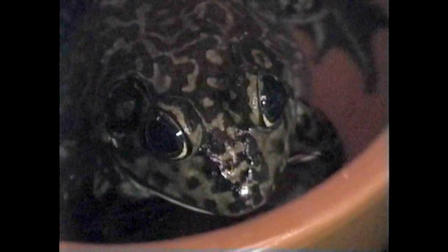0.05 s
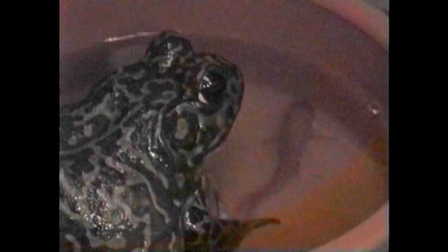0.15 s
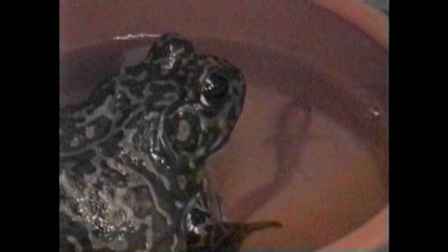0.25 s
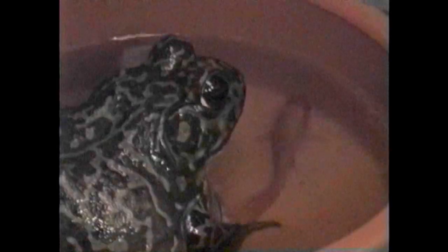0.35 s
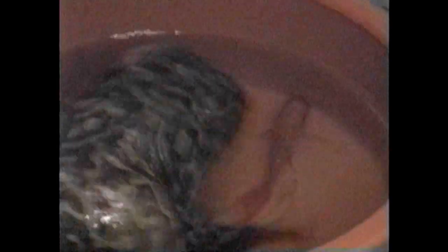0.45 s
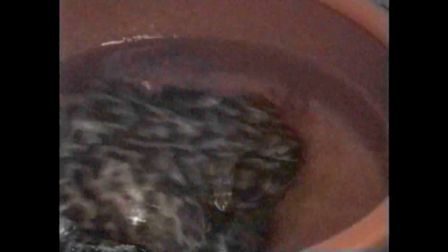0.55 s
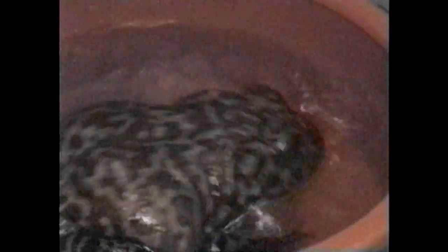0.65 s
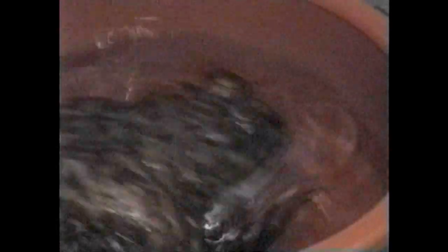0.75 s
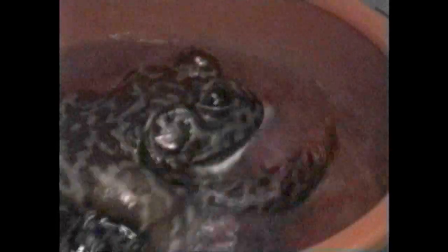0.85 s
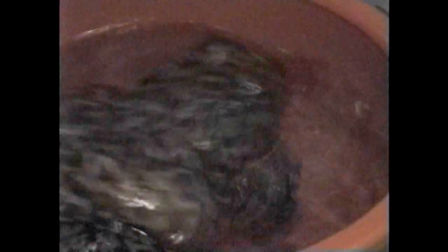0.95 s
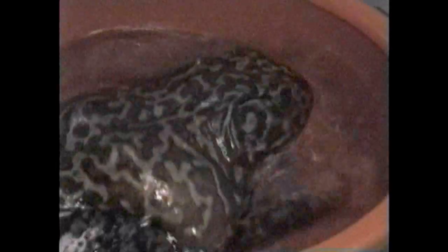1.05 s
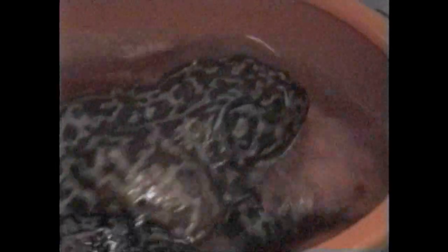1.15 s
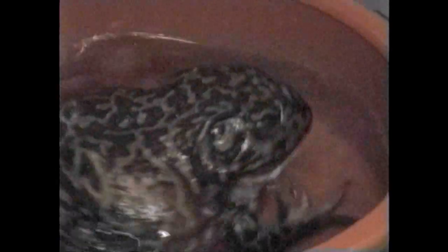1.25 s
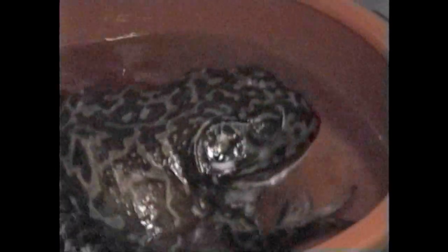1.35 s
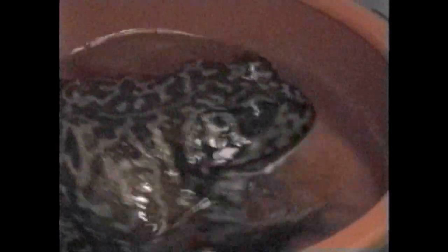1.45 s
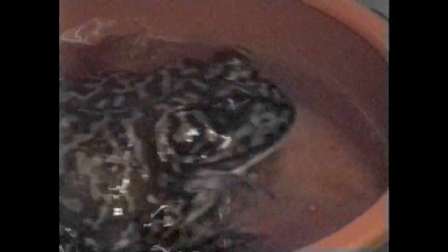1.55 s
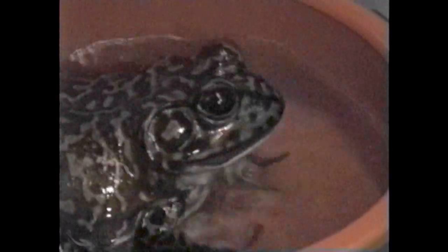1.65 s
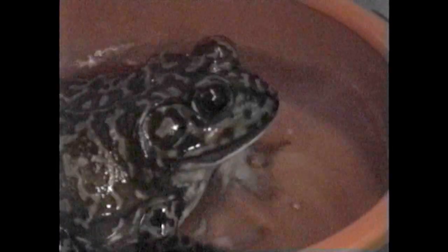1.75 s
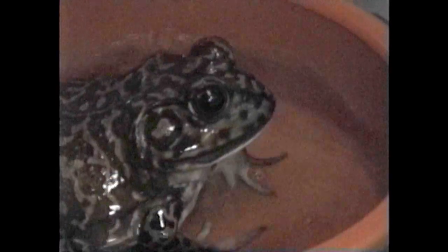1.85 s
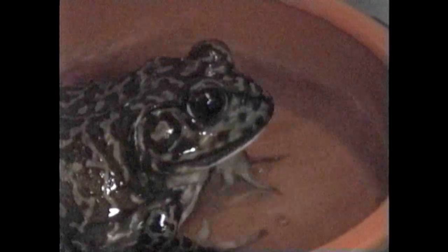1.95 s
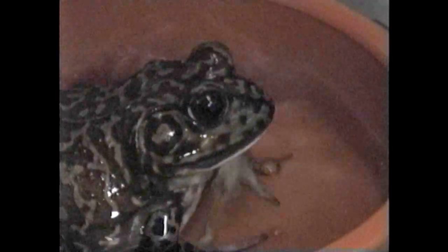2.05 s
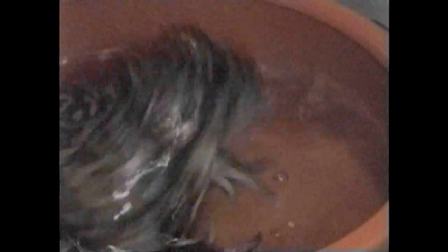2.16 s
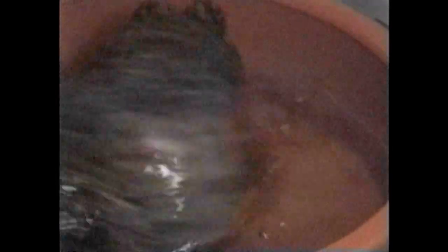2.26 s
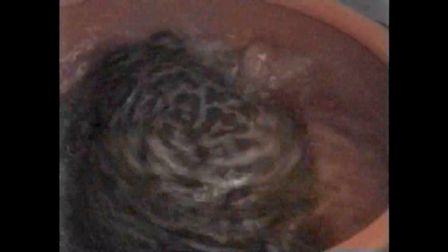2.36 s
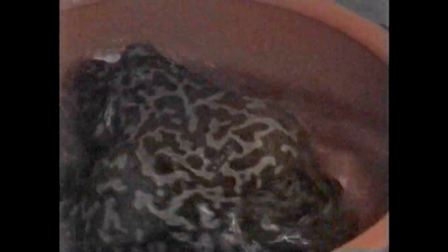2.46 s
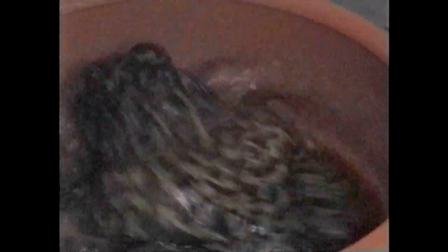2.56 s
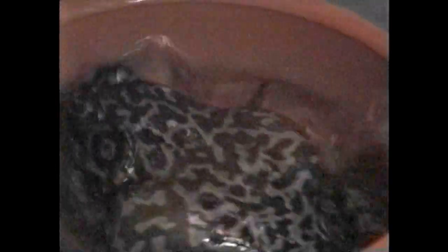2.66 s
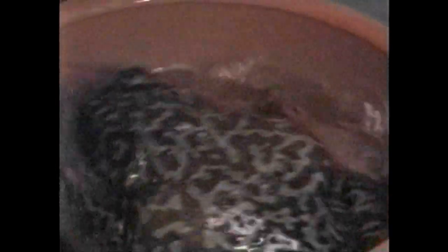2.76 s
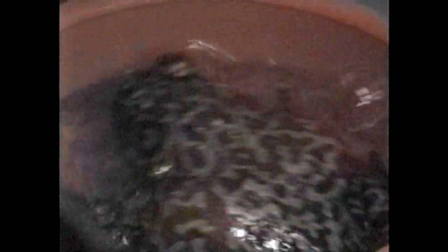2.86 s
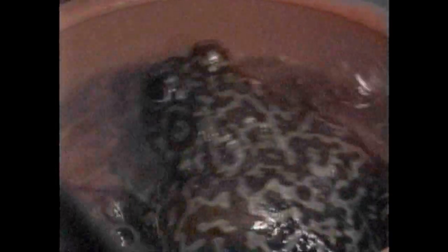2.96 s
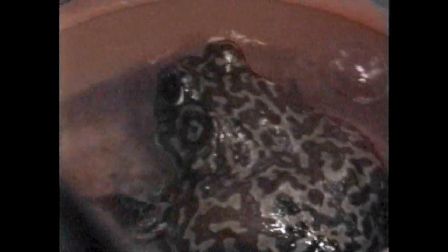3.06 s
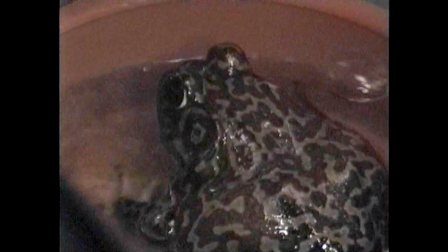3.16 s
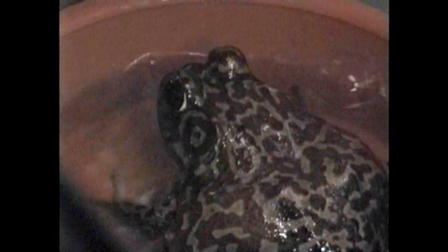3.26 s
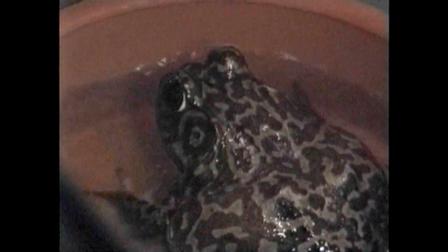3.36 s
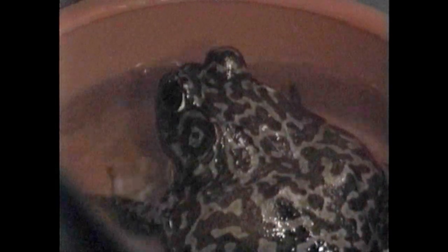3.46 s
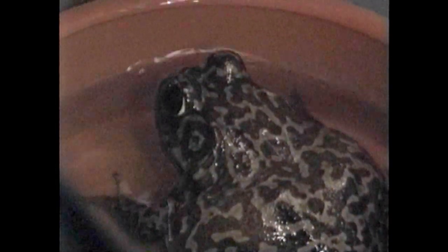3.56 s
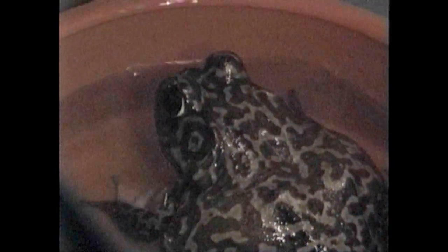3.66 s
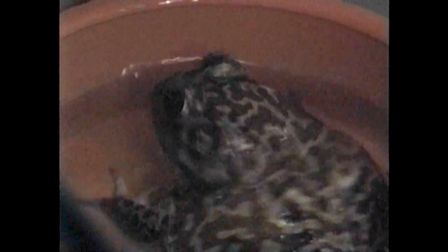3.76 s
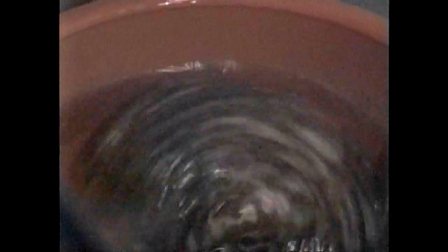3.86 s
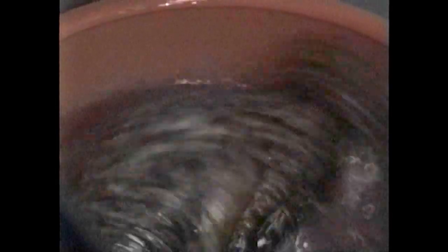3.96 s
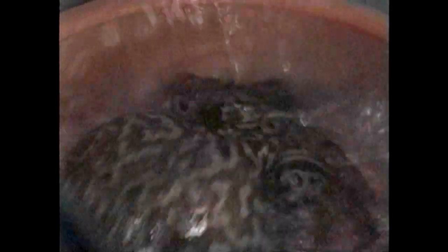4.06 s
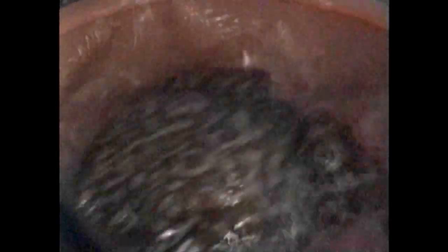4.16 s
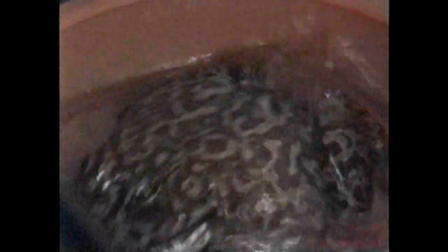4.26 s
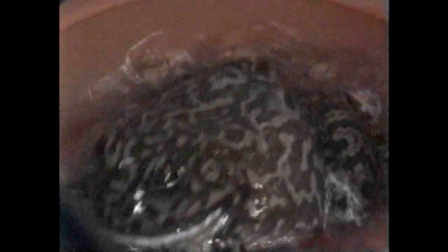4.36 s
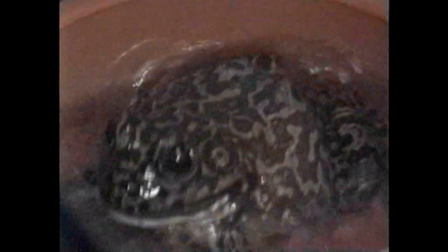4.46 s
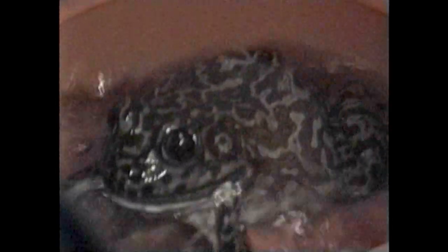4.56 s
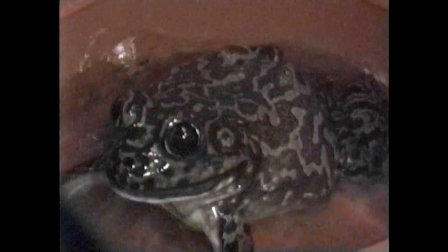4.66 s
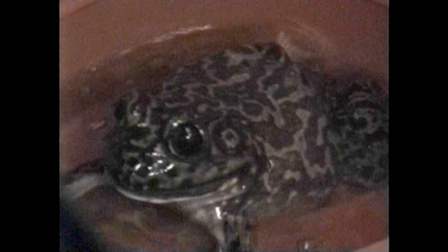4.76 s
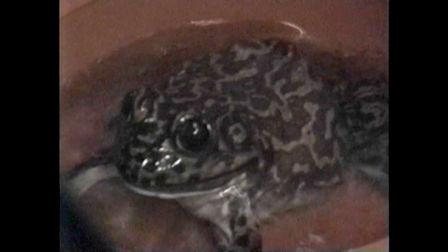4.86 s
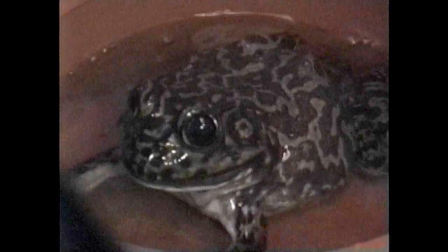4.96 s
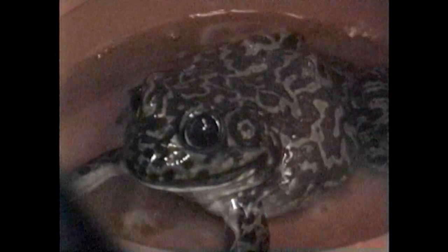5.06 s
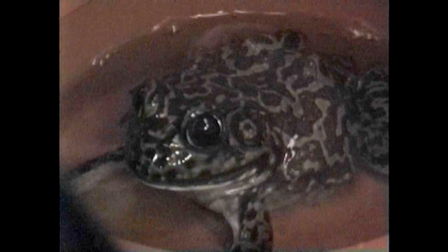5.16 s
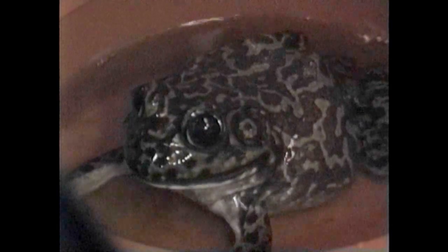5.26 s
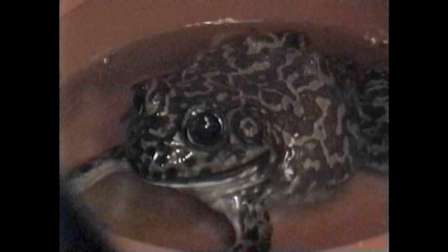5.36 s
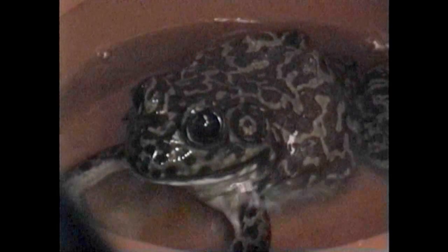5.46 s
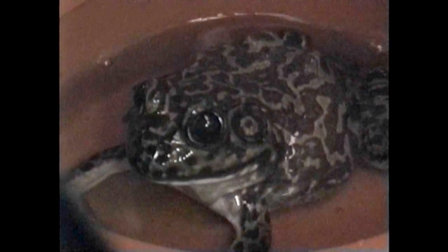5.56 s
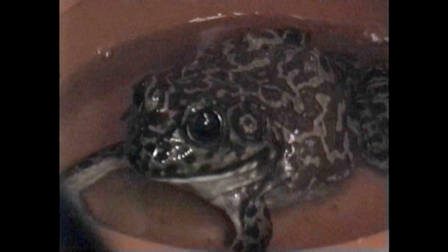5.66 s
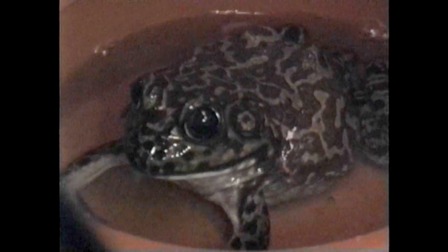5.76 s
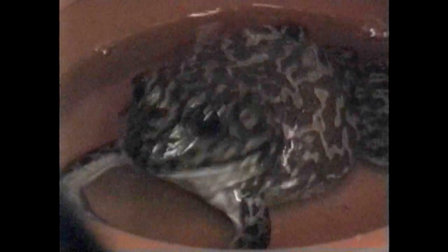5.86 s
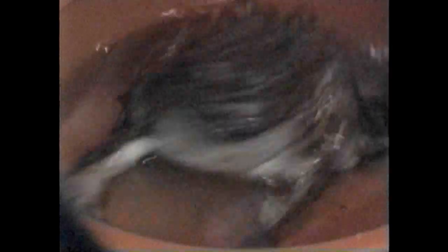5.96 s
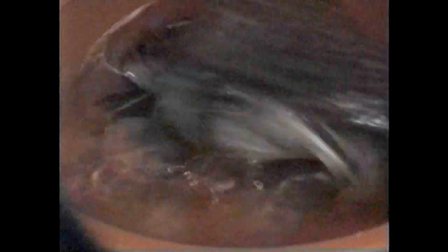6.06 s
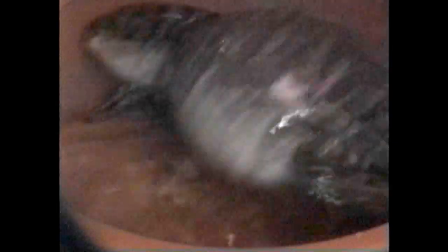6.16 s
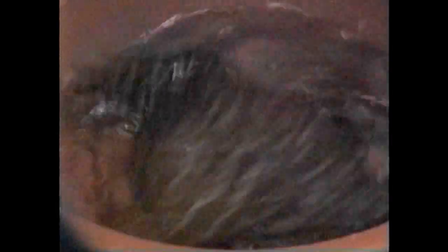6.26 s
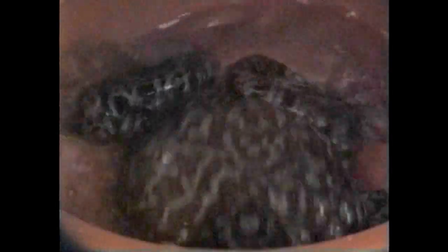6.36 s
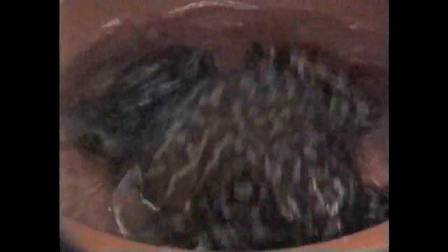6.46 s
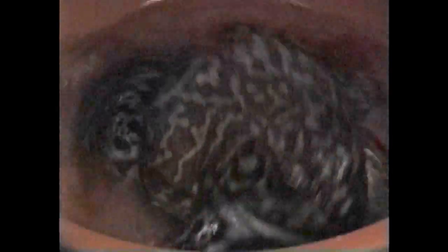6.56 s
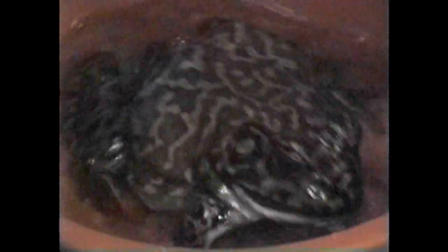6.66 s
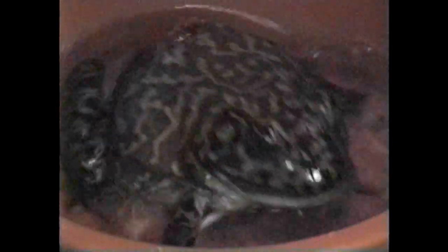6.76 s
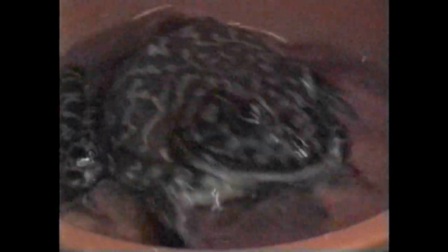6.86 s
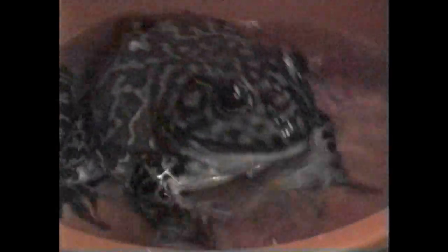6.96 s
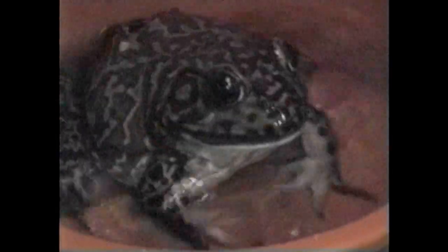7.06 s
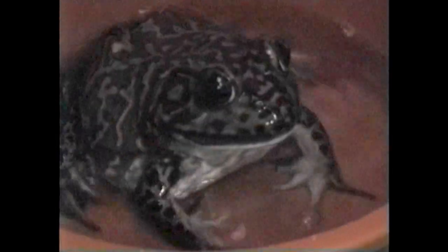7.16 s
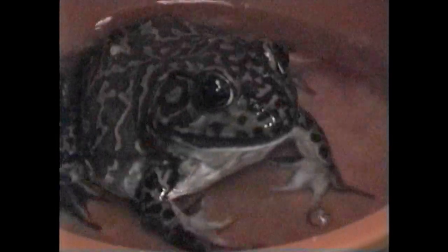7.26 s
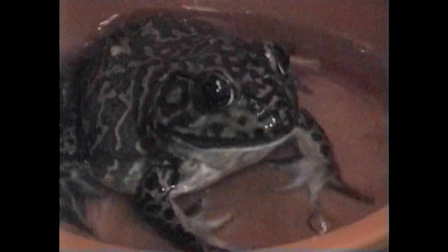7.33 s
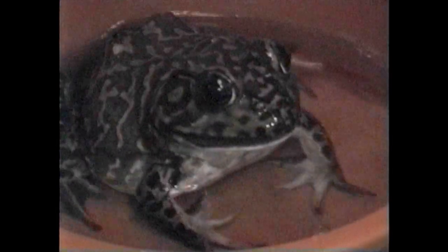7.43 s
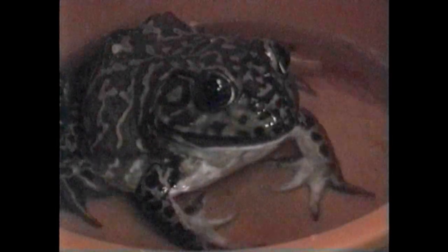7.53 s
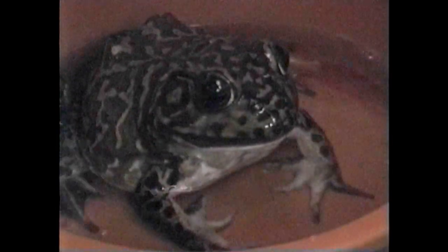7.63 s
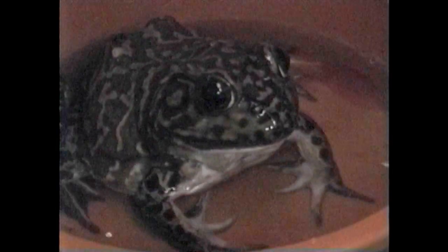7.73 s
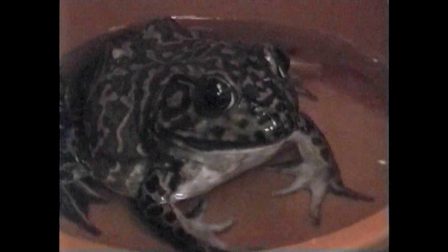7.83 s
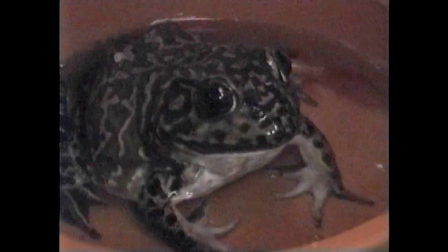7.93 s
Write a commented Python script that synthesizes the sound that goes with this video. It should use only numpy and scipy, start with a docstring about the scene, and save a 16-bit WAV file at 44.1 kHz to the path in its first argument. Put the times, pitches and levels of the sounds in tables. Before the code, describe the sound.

Close, sharp splashes and gurgles come in fits as a frog lunges through shallow water, with motors humming and buzzing throughout.

```python
"""Frog lunging in a plastic tub.

A big frog lunges in shallow water, close to a camera's two sound ports. Sheets of water slap and fizz, trapped
air pockets ring, the water churns between slaps. One brief low tone sounds at the start. Indoors; motors hum
and whine and a buzz sounds steadily, mostly stronger and of opposite sign on the right port."""
import sys
import numpy as np
from scipy import signal
from scipy.fft import rfft, irfft, next_fast_len
from scipy.io import wavfile
from scipy.ndimage import uniform_filter1d, map_coordinates

SR = 44100
rng = np.random.default_rng(int(sys.argv[2]) if len(sys.argv) > 2 else 0)


def wav_record(signal):
    """Record a signal, one row per channel, as 16-bit PCM in the file named by sys.argv[1]."""
    frames = np.transpose(np.atleast_2d(signal))
    bounded = np.clip(frames, -1, 1)
    # unit amplitude maps onto the largest positive 16-bit level
    quanta = np.round(bounded * 32767).astype(np.int16)
    wavfile.write(sys.argv[1], SR, quanta)


N = 352509

# motor and room noise: freq_hz, left_db_per_hz, right_db_per_hz, correlation
MOTOR_NOISE = [(20, -94, -108, 0.18), (39, -82, -90, 0.85), (58.6, -80.5, -74, 0.19),
               (78.6, -95, -79, -0.18), (105, -73.5, -69, -0.6), (150, -83, -71, -.5),
               (250, -80, -69, -.62), (350, -81, -73, -.55), (450, -82, -77, -.55), (650, -87, -82, -.55),
               (900, -87, -84, -.5), (1380, -92.5, -90.5, -0.37), (1820, -90.5, -94.5, 0.43),
               (2400, -102.5, -97.5, 0.85), (4500, -101, -100, -0.64), (8200, -104, -101, -0.64),
               (10440, -103, -101, -0.75), (10400, -104.5, -101, 0.18)]
# motor whines: pitch_hz, left_db, right_db
MOTOR_WHINES = [(58.9, -71, -62), (99.8, -82, -57), (148, -75, -59), (227.9, -66, -57), (322, -63, -64),
                (470.6, -69, -59), (510, -69, -64), (549.8, -67, -58), (659.3, -70, -65), (694.6, -68, -58),
                (747.1, -67, -61), (765.6, -72, -63), (868.8, -71, -70), (899.7, -68, -72), (942, -76, -68),
                (988.9, -67, -70), (1531, -84, -71), (1590, -79, -73), (1649, -77, -76)]
# envelope of the buzz harmonics: freq_hz, left_db, right_db
BUZZ_SPECTRUM = [(129.6, -101, -49), (250, -58, -100), (618, -79, -100), (671, -45, -93), (796, -79.5, -86),
                 (1080, -68, -65.5), (1270, -87, -84), (1375, -114, -68.5), (2025, -134, -69),
                 (2200, -124, -81.5), (2560, -74, -83.5), (3830, -80.5, -76), (5900, -100, -100)]
# air trapped under water: start_s, level_db, pitch_hz, t60_s
AIR_POCKETS = [(.325, -49.5, 1084, 0.05), (.68, -47.5, 4920, 0.056), (0.763, -38.5, 2980, 0.094),
               (1.012, -46, 1010, 0.062), (1.014, -38, 550, 0.08), (1.097, -49, 6230, 0.07),
               (1.202, -33, 337, 0.059), (1.217, -46, 5900, 0.08), (1.608, -48, 1396, 0.043),
               (2.141, -34.5, 2590, 0.036), (2.207, -33.5, 4350, 0.04), (2.21, -41.5, 2400, .06),
               (2.273, -44.5, 2430, 0.057), (2.421, -30, 2536, 0.051), (2.432, -48, 5280, 0.028),
               (2.449, -39, 6440, .04), (2.493, -28.5, 3820, .05), (2.538, -37, 2380, 0.036),
               (2.542, -30, 7150, .03), (2.549, -40, 1840, 0.068), (2.575, -37.5, 980, 0.1),
               (2.577, -42, 1790, .05), (2.614, -28, 2130, 0.052), (2.764, -35, 1325, 0.066),
               (2.769, -30.5, 3670, 0.07), (2.835, -38, 2596, 0.034), (3.079, -48, 1420, 0.048),
               (3.977, -47.5, 1450, .06), (4.091, -39, 750, 0.048), (4.187, -25, 2664, 0.037),
               (4.225, -38, 2510, 0.065), (4.269, -23, 1010, 0.067), (4.283, -29, 1445, 0.083),
               (4.301, -25, 776, 0.073), (4.308, -36.5, 4360, 0.069), (4.305, -21.5, 358, 0.12),
               (4.317, -34, 2626, 0.074), (4.484, -41, 3620, 0.046), (4.775, -50, 3530, 0.033),
               (6.256, -41, 4030, 0.026), (6.27, -30.5, 2730, 0.029), (6.332, -44, 1520, .05),
               (6.335, -40, 3470, .04), (6.361, -31, 313, 0.047), (6.403, -29, 3730, .05),
               (6.41, -33, 1950, 0.06), (6.452, -40, 1900, 0.053), (6.579, -41, 4260, 0.051),
               (6.655, -46, 3590, 0.037)]
# bubble ring by pitch: pitch_hz, rise_s, quiver_rad
BUBBLE_RING = [(352, 0.0029, 0.28), (990, 0.0047, 0.61), (2500, 0.0022, 1.3), (4500, 0.0013, 1.5)]
# lunges that stir the water: start_s, peak_s, froth_db, spray_db
FROG_LUNGES = [(.55, 0.66, -59, -82), (0.948, 1.216, -58.5, -69), (2.03, 2.173, -53.5, -56),
               (2.46, 2.63, -46, -58), (2.728, 2.785, -52.5, -59), (2.907, 3.12, -63, -65),
               (3.985, 4.21, -44, -50), (6.138, 6.364, -50, -59)]
# water slaps: start_s, froth_db, spray_db, push_db, smack_db, froth_hz, rise_s, t60_s, left_over_right_db
WATER_SLAPS = [(0.5729, -46, -41.5, -53, -54, 3580, 0.0029, 0.13, 0),
               (0.6274, -45, -42, -64, -56, 3310, .002, 0.046, .1),
               (0.6812, -53, -71, -63, -57, 4970, 0.0027, 0.049, .1),
               (0.7254, -56, -52.5, -48, -53, 3280, .003, 0.053, -3),
               (.843, -61, -57, -58, -59, 3030, .003, .08, -2),
               (1.007, -51.5, -40.5, -33, -42, 3670, 0.0035, .14, -1),
               (1.094, -56.5, -45.5, -52, -58, 1920, 0.0033, 0.18, -5),
               (1.1402, -50, -62, -52, -50, 3300, 0.0028, 0.089, 0),
               (1.202, -54, -52.5, -56, -57, 1844, 0.0045, 0.17, 1),
               (1.234, -61, -52, -56, -60, 5900, 0.0096, 0.062, 4),
               (1.3413, -62, -41.5, -42, -54, 2050, 0.0017, 0.084, 2),
               (1.759, -52, -59.5, -54, -53, 2210, 0.0031, 0.079, 1),
               (2.1245, -44, -44, -59, -37.5, 2844, 0.0073, 0.094, -2.5),
               (2.188, -43, -51, -54, -50, 3920, 0.0038, 0.18, 2),
               (2.255, -49, -37.5, -71, -56, 3230, 0.0061, 0.035, 1),
               (2.2732, -48.5, -44.5, -66, -52, 2495, 0.0017, 0.057, 3),
               (2.4077, -41, -51.5, -67, -45, 3560, .005, 0.24, -2),
               (2.4433, -40, -38.5, -60, -49, 3650, 0.003, 0.12, .1),
               (2.4887, -33, -30, -47, -39, 3880, 0.0024, 0.052, -3),
               (2.495, -31.5, -30, -49, -32, 3590, 0.0022, 0.12, 0),
               (2.535, -37.5, -35, -47, -43, 2270, 0.0081, 0.13, 2),
               (2.594, -39, -28.5, -38, -34, 3910, 0.0094, 0.088, 1),
               (2.611, -27, -30.5, -36, -28, 2614, 0.0029, 0.061, 1.5),
               (2.622, -36.5, -43.5, -35, -28, 2450, 0.0059, 0.077, 5),
               (2.679, -43, -70, -53, -57, 5060, 0.004, 0.066, -4),
               (2.747, -56, -45, -42, -46, 3450, 0.0069, 0.1, .1),
               (2.7625, -38, -35.5, -43, -37, 3400, 0.0031, 0.13, 0),
               (2.8351, -44, -43.5, -66, -48, 2770, 0.0017, 0.025, -1),
               (2.958, -58, -51, -58, -61, 1780, 0.0022, 0.035, -4),
               (3.25, -60, -54.5, -73, -60, 2520, 0.0022, 0.041, -3),
               (3.4273, -64, -41.5, -32, -56, 1800, 0.0013, 0.056, 3),
               (3.95, -62, -53, -54, -64, 1980, 0.0038, 0.16, -1),
               (4.031, -47.5, -46.5, -63, -47, 1870, .01, 0.29, -1),
               (4.057, -46, -40, -59, -48, 2530, 0.0095, 0.59, 1),
               (4.0818, -27.5, -31.5, -33, -24, 5030, 0.00088, 0.12, 4),
               (4.0903, -32, -22, -26, -21, 2510, 0.0032, 0.097, 0.5),
               (4.1628, -34.5, -30, -42, -45, 3620, 0.017, 0.11, 2),
               (4.1794, -39, -32, -33.5, -46, 2660, 0.004, 0.13, 6),
               (4.297, -33.5, -28, -27, -30, 2810, 0.0097, 0.12, 3),
               (4.388, -50, -47.5, -51, -52, 3430, 0.0031, 0.11, 2),
               (4.4353, -46.5, -63, -67, -43, 2110, .005, 0.088, 2),
               (4.484, -46, -72, -41, -59, 3270, 0.0033, 0.061, 0),
               (4.506, -46.5, -51, -59, -55, 1690, 0.002, 0.041, 1),
               (4.5887, -52.5, -51.5, -51, -58, 1580, 0.002, 0.059, .1),
               (4.6358, -76, -51, -65, -65, 1560, .003, 0.067, 1),
               (4.894, -64, -49.5, -51, -43, 1490, 0.0027, 0.095, -3),
               (5.3275, -69, -50.5, -65, -63, 1740, 0.0018, 0.036, 1),
               (6.183, -49, -50, -51, -57, 1890, .003, 0.048, 4),
               (6.19, -47, -49.5, -69, -38.5, 2950, 0.0018, 0.13, 0),
               (6.254, -45.5, -46.5, -49, -50, 3880, 0.0036, 0.14, .1),
               (6.3092, -48.5, -48, -54, -42, 3180, 0.0082, 0.15, 2),
               (6.331, -38, -38, -39, -44, 2420, 0.0046, 0.037, 2),
               (6.3868, -50, -29, -57, -35, 1770, 0.002, 0.086, 2),
               (6.393, -33, -33, -61, -49, 3330, 0.013, 0.13, 1),
               (6.411, -37, -34, -52, -54, 2280, 0.0043, 0.1, 5),
               (6.577, -48, -47, -57, -54, 4700, 0.0032, 0.09, -4.5),
               (6.654, -59, -50.5, -58, -60, 3330, 0.0021, 0.047, 0),
               (7.139, -57.5, -54, -65, -60, 2000, 0.0028, 0.037, -5),
               (7.375, -59, -56, -59, -62, 4230, 0.0045, 0.051, 2),
               (7.655, -61.5, -59, -58, -66, 2000, .003, 0.15, .1)]
# tub and wall reverb: freq_hz, t60_s, level_db
ROOM_DECAY = [(300, 0.14, -9), (1940, 0.1, -7.5), (10000, 0.039, 0.5)]
# tub sound at the ports: freq_hz, left_over_right_db
PORT_BALANCE = [(100, -4), (350, -9), (600, -5), (1500, -2), (2600, 1), (4000, -4.5), (11000, -3)]
# tub sound at the ports: freq_hz, right_lag_rad
PORT_PHASE = [(300, 5), (700, 0.5), (1300, 1.5), (2200, 0.5), (4000, -1.74), (8000, -3.5)]

BUZZ_HZ, LINE_LAG_RAD = 119.88, np.array([[0], [2.4]])
KNOT_STEP_DB, KNOT_DETUNE, KNOT_DELAY_S = 9, 0.0388, 0.003
BUBBLE_CLIMB_PER_T60, FIZZ_CLIMB_PER_LIFE = 0.026, 0.024
STIR_DB, SETTLE_DB_PER_S = 20.5, 100
SPRAY_HZ, SPRAY_OCT_PER_DB = 7970, 0.15
SLOSH_HZ, SLOSH_DB, SLOSH_PER_FROTH, SLOSH_PER_PUSH = 750, -48, 0.22, 0.39
FROTH_REF_DB, PUSH_REF_DB = -41, -57.5
SMACK_HZ, CRACKLE_DB = 4780, 2.5
LOW_CUT_HZ, TOP_HZ = 20, 10980


def amp(db):
    """Decibels to gain."""
    return 10 ** (np.asarray(db) / 20)


def unit(x):
    """Scale to rms 1."""
    return x / np.sqrt(np.mean(x ** 2) + 1e-20)


def along(table, hz):
    """Table columns interpolated at hz on a log axis."""
    freq_hz, *columns = np.transpose(table)
    return np.array([np.interp(np.log(hz + 1), np.log(freq_hz + 1), column) for column in columns])


def wobble(rate_hz):
    """Smooth random curve, rms near 1."""
    points = rng.standard_normal(int(N * rate_hz / SR) + 4)
    return map_coordinates(points, [np.arange(N) * rate_hz / SR])


def filtered(x, response):
    """Apply a complex frequency response."""
    size = next_fast_len(N + SR // 2)
    return irfft(rfft(x, size) * response(np.fft.rfftfreq(size, 1 / SR)), size)[..., :N]


def swell(t, rise_s, t60_s):
    """Smooth rise, then a steepening fall in dB."""
    attack = np.sin(np.pi / 2 * np.clip(t / rise_s, 0, 1)) ** 2
    return attack * amp(-60 * (np.maximum(t - rise_s, 0) / t60_s) ** 1.067)


def burst(envelope, bed):
    """Enveloped bed at the envelope's rms."""
    return unit(envelope * bed) * np.sqrt(np.mean(envelope ** 2))


def motor_hum():
    """Broad motor noise, partly correlated, mostly of opposite sign between ports."""
    def colour(hz):
        left_db, right_db, correlation = along(MOTOR_NOISE, hz)
        gains = [amp(left_db), amp(right_db) * correlation, amp(right_db) * np.sqrt(1 - correlation ** 2)]
        return np.sqrt(SR / 2) * np.array(gains)
    shared, own = rng.standard_normal((2, N)) * amp(1.42 * wobble(7))
    left, right_shared, right_own = filtered(np.array([shared, shared, own]), colour)
    return np.array([left, right_shared + right_own])


def motor_whine():
    """Motor tones, slightly unsteady in phase and level."""
    out, t = np.zeros((2, N)), np.arange(N) / SR
    for hz, left_db, right_db in MOTOR_WHINES:
        drift_rad = 0.5 * wobble(4) + 2 * np.pi * rng.random()
        gain = amp([[left_db], [right_db]]) * amp(1.6 * wobble(5))
        out += gain * np.sin(2 * np.pi * hz * t + drift_rad - LINE_LAG_RAD)
    return out * np.sqrt(2)


def steady_buzz():
    """Phase-locked harmonics: one sharp pulse per cycle."""
    out, t = np.zeros((2, N)), np.arange(N) / SR
    phase_rad = 2 * np.pi * BUZZ_HZ * t + 0.012 * wobble(4.2)
    for k in range(1, 38):
        gain = amp(along(BUZZ_SPECTRUM, k * BUZZ_HZ))[:, None]
        out += gain * np.cos(k * phase_rad - LINE_LAG_RAD)
    return out * np.sqrt(2)


def low_tone(start_s=0.03, level_db=-35.5, pitch_hz=372):
    """A soft low tone swells and fades."""
    t = np.arange(N) / SR - start_s
    tone = np.sin(2 * np.pi * pitch_hz * t + 0.38 * wobble(32.6))
    return amp(level_db) * swell(t, rise_s=0.016, t60_s=0.4) * tone


def bubbles():
    """Trapped air rings in knots of three bubbles; tones quiver, fade and climb near the surface."""
    out, t = np.zeros(N + SR), np.arange(SR // 5) / SR
    quiver = wobble(300)
    for start_s, level_db, hz, t60_s in AIR_POCKETS:
        rise_s, quiver_rad = along(BUBBLE_RING, hz)
        cycles = hz * t * (1 + BUBBLE_CLIMB_PER_T60 / 2 * t / t60_s)
        knot = rng.standard_normal((3, 2)) * [[0], [1], [1]]  # first bubble on pitch, on time
        for k, (detune, delay) in enumerate(knot):
            onset = round((start_s + KNOT_DELAY_S * abs(delay)) * SR)
            span = slice(onset, onset + len(t))
            tone = np.sin(2 * np.pi * cycles * (1 + KNOT_DETUNE * detune) + quiver_rad * quiver[span])
            out[span] += amp(level_db - KNOT_STEP_DB * k) * swell(t, rise_s, t60_s) * tone
    return out[:N]


def fizz(hz, spread_oct, life_cycles, spread_db, lag_us, count, grain_n, bed_n):
    """Stereo bed of small bursting bubbles, each with its own lag between ports."""
    place, phase_cycles = rng.random((count, 2)).T[:, :, None]
    pitch_hz = np.clip(hz * 2 ** (spread_oct * rng.standard_normal((count, 1))), 200, 11500)
    gain = amp(spread_db * np.clip(rng.standard_normal((count, 1)), -2, 2))
    lag_s = lag_us * 1e-6 * rng.standard_normal((count, 1))
    k = np.arange(grain_n)
    index = (place * (bed_n + grain_n)).astype(int) + k
    life = k / SR * pitch_hz / life_cycles
    envelope = gain * life * np.exp(-2 * life) * (1 - k / grain_n)
    ports = []
    for side in (-0.5, 0.5):
        cycles = pitch_hz * (k / SR + side * lag_s) * (1 + FIZZ_CLIMB_PER_LIFE / 2 * life)
        rings = envelope * np.sin(2 * np.pi * (cycles + phase_cycles))
        bed = np.bincount(index.ravel(), rings.ravel(), bed_n + 2 * grain_n)
        ports.append(bed[grain_n:grain_n + bed_n])
    return unit(np.array(ports))


def churn():
    """Each lunge stirs up clumps of froth and spray, then the water settles."""
    out, t = np.zeros((2, N)), np.arange(N) / SR
    froth = fizz(2736, 0.61, 7.9, 1.8, 61, count=7000, grain_n=300, bed_n=N) * amp(0.46 * wobble(30))
    spray = fizz(7610, 0.454, 36, 5.6, 39, count=11000, grain_n=110, bed_n=N) * amp(1.9 * wobble(30))
    for start_s, peak_s, froth_db, spray_db in FROG_LUNGES:
        stir_db = STIR_DB * (t - peak_s) / (peak_s - start_s)
        settle_db = SETTLE_DB_PER_S * (peak_s - t)
        out += amp(np.minimum(stir_db, settle_db)) * (amp(froth_db) * froth + amp(spray_db) * spray)
    return out


def slaps():
    """Sheets of water smack, froth, spray, slosh and push air at the ports. Returns splash, push."""
    splash, push = np.zeros((2, 2, N + SR))
    n = SR // 8
    t = np.arange(n) / SR
    crackle = amp(CRACKLE_DB * wobble(550))  # drops land unevenly
    for start_s, froth_db, spray_db, push_db, smack_db, froth_hz, rise_s, t60_s, pan_db in WATER_SLAPS:
        onset = round(start_s * SR)
        span = slice(onset, onset + n)
        envelope = swell(t, rise_s, t60_s) * crackle[span]
        # more spray than froth: finer, higher spray
        spray_hz = np.clip(SPRAY_HZ * 2 ** (SPRAY_OCT_PER_DB * (spray_db - froth_db)), 5500, 10800)
        slosh_db = SLOSH_DB + SLOSH_PER_FROTH * (froth_db - FROTH_REF_DB)
        slosh_db += SLOSH_PER_PUSH * (push_db - PUSH_REF_DB)
        froth = fizz(froth_hz, 0.4, 19.5, 2.4, 77, count=190, grain_n=600, bed_n=n)
        spray = fizz(spray_hz, 0.502, 34, 0.56, 49, count=900, grain_n=220, bed_n=n)
        slosh = fizz(SLOSH_HZ, 0.9, 0.61, 5.3, 56, count=240, grain_n=350, bed_n=n)
        smack = fizz(SMACK_HZ, 1.7, 0.42, 1.4, 57, count=1500, grain_n=60, bed_n=n // 4)
        smack = np.pad(smack, ((0, 0), (0, n - n // 4)))
        slap = amp(smack_db) * swell(t, rise_s=0.0005, t60_s=0.013) * smack
        for level_db, bed in (froth_db, froth), (spray_db, spray), (slosh_db, slosh):
            slap += amp(level_db) * burst(envelope, bed)
        splash[:, span] += amp([[pan_db / 2], [-pan_db / 2]]) * slap
        push[:, span] += amp(push_db) * np.array([[0.9], [0.15]]) * swell(t, rise_s=0.0052, t60_s=0.061)
    return splash[:, :N], push[:, :N]


def gurgle(x, depth_db):
    """The shifting surface briefly lifts some pitches and hollows others."""
    spectra = signal.stft(x, nperseg=256)[2]
    field = uniform_filter1d(rng.standard_normal(spectra.shape[1:]), size=4, axis=0)
    field = unit(uniform_filter1d(field, size=9, axis=1))
    return signal.istft(spectra * unit(amp(depth_db * field)), nperseg=256)[1][:, :N]


def room(x):
    """Tub and wall reverb; each frequency decays at its own rate."""
    hz, t, spectra = signal.stft(rng.standard_normal((2, SR // 3)), SR, nperseg=256)
    t60_s, _ = along(ROOM_DECAY, hz)
    tail = signal.istft(spectra * amp(-60 * t / t60_s[:, None]), SR, nperseg=256)[1]
    delayed = np.pad(x, (200, 0))[None]
    wet = signal.fftconvolve(delayed, tail / np.linalg.norm(tail[0]), axes=1)[:, :N]
    return filtered(wet, lambda f: amp(along(ROOM_DECAY, f)[1]))


def port_response(hz):
    """Level and phase split of the tub's sound between ports."""
    side = np.array([[0.5], [-0.5]])
    return amp(side * along(PORT_BALANCE, hz)) * np.exp(1j * side * along(PORT_PHASE, hz))


def scene():
    """Water at each port, over the motors and the buzz."""
    splash, push = slaps()
    tub = gurgle(splash + churn(), depth_db=3.6) + bubbles() + low_tone()
    at_ports = filtered(tub + room(tub.mean(axis=0)), port_response)
    return at_ports + push + motor_hum() + motor_whine() + steady_buzz()


def record(dry):
    """The camera blocks deep bass and cuts steeply above its band limit."""
    def response(hz):
        high_pass = 1j * hz / (LOW_CUT_HZ + 1j * hz)
        top_db = np.interp(hz - TOP_HZ, [0, 250, 1000, 4000], [0, -36, -52, -66])
        return high_pass * amp(top_db)
    return filtered(dry, response)


dry = scene()
out = record(dry)
wav_record(out)
```